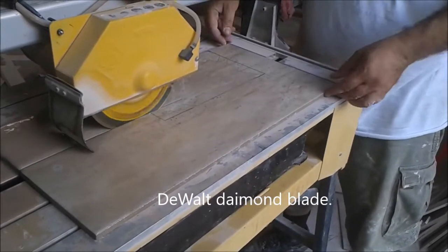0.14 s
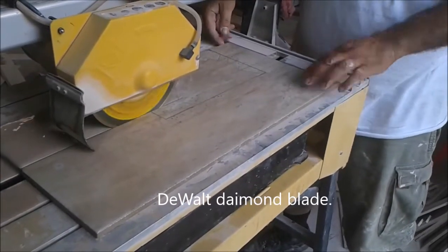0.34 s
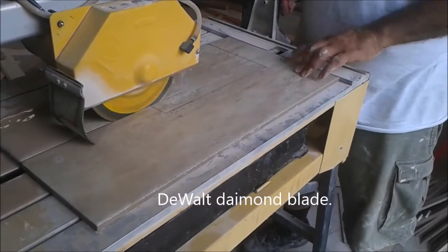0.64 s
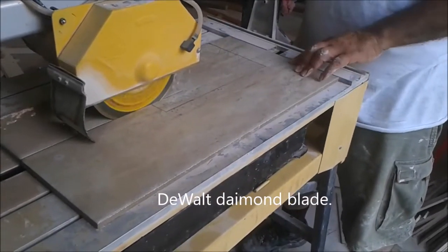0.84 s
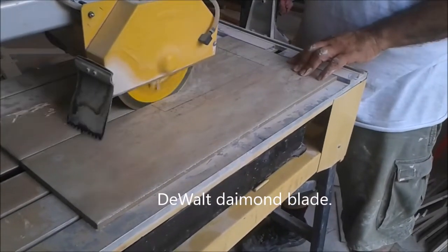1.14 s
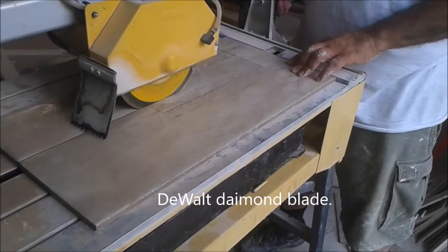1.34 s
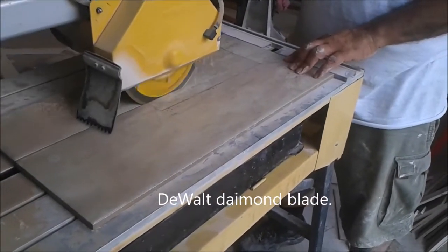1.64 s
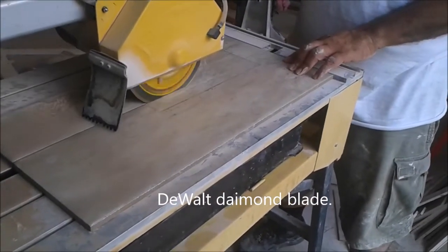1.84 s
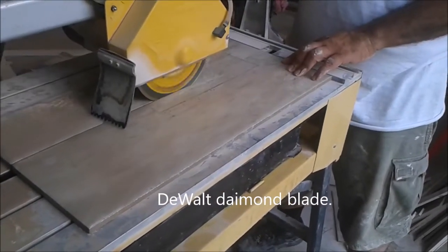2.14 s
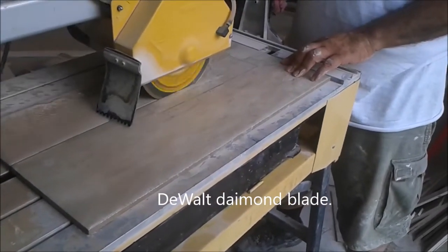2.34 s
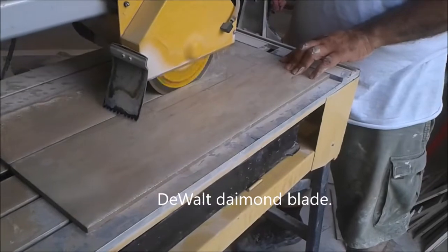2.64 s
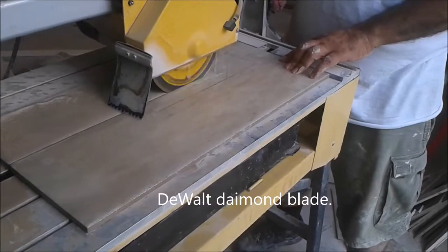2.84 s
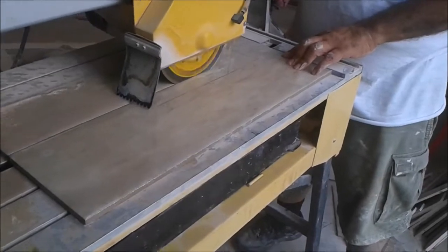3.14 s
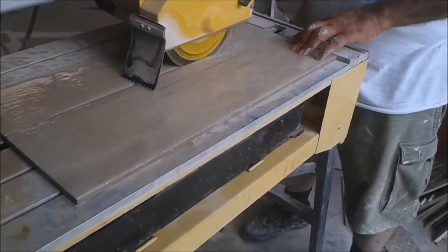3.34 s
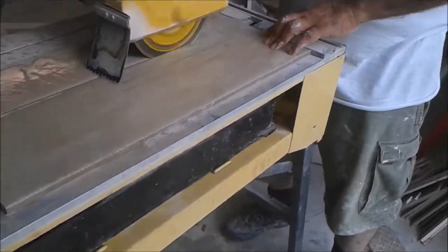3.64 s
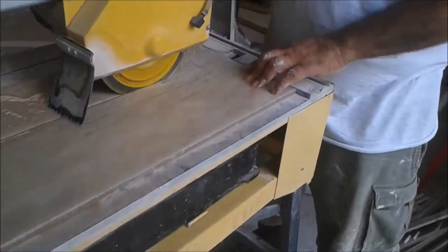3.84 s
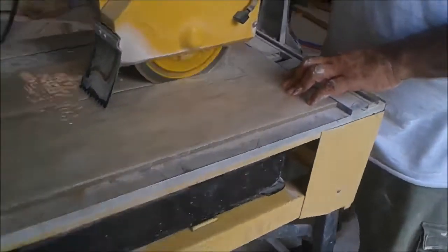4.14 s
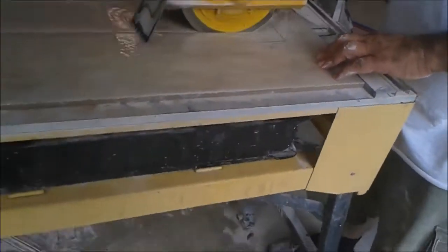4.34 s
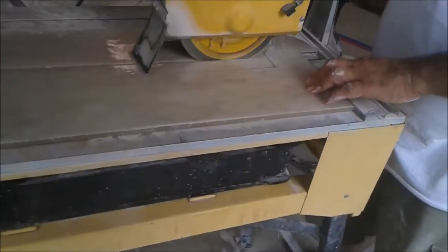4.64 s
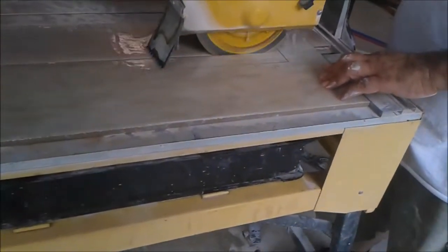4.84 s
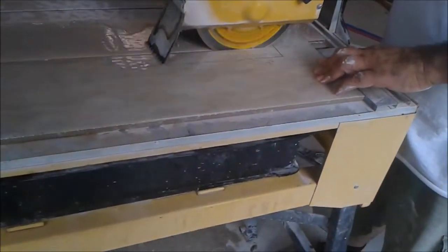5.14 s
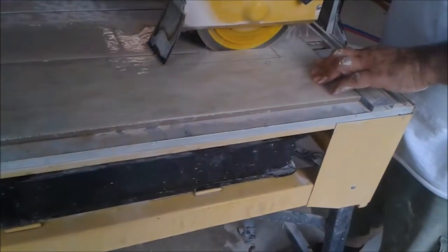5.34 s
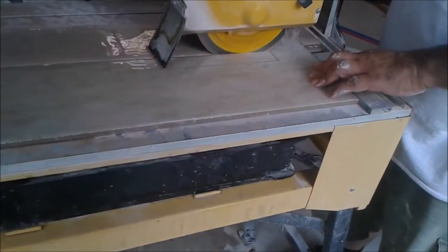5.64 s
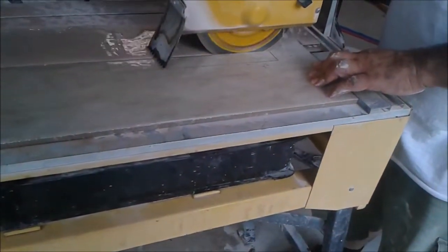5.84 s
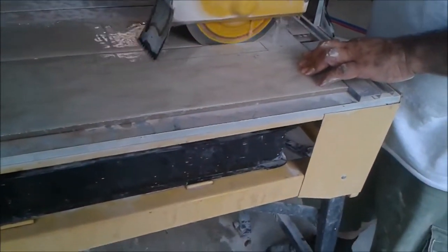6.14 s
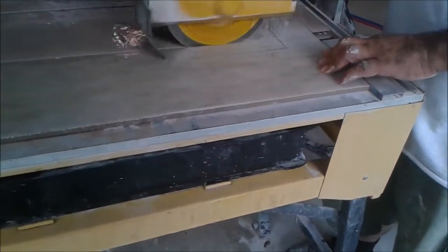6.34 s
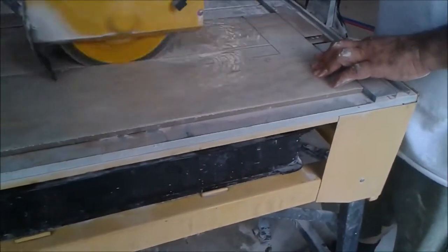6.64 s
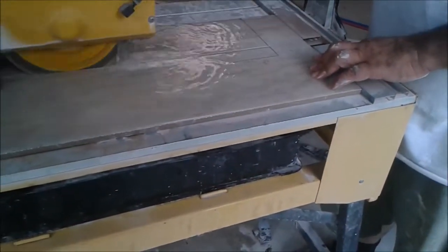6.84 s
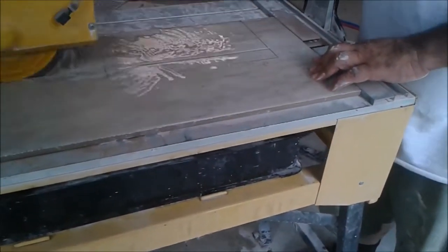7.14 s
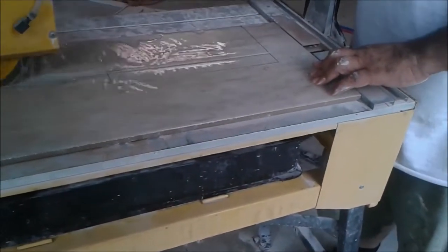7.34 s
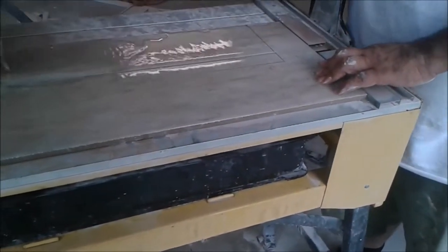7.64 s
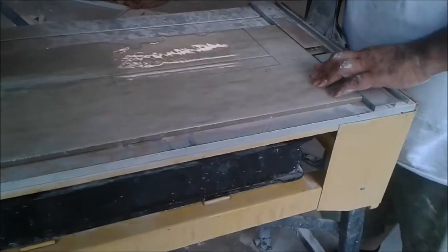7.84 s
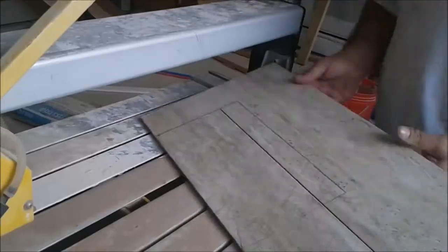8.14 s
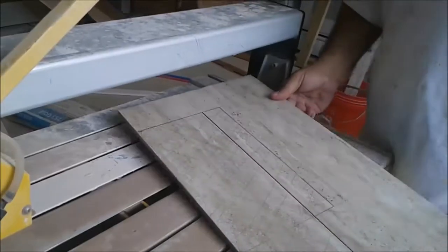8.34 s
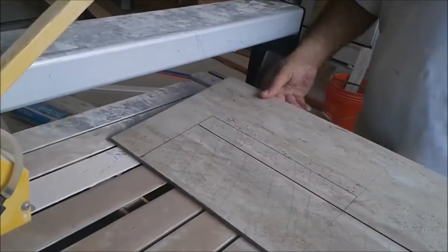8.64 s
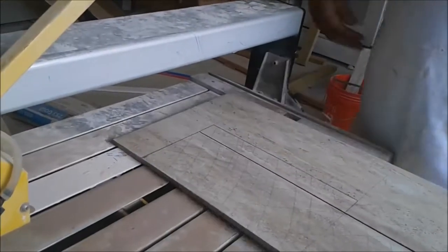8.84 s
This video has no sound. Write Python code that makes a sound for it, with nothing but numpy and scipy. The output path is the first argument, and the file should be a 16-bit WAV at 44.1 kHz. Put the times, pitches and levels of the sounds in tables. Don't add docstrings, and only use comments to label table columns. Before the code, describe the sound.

A wet tile saw whirs, bites into a large tile with a harsh ringing grind, winds down, then a tile knocks and slides on slats.

```python
import sys
import numpy as np
from scipy import signal
from scipy.fft import irfft
from scipy.io import wavfile
from scipy.ndimage import uniform_filter1d

SR = 44100
rng = np.random.default_rng(int(sys.argv[2]) if len(sys.argv) > 2 else 0)


def invert_db(level):
    return 10 ** (np.asarray(level, dtype=float) / 20)


def transcribe(u):
    v = np.clip(np.atleast_2d(u).T, -1, 1)
    q = np.round(v * 32767).astype(np.int16)
    wavfile.write(sys.argv[1], SR, q)


N = 396018
HZ = np.fft.rfftfreq(1024, 1 / SR)[:, None]
T = np.arange(-(-N // 256) + 1) * 256 / SR
LULL_S, OFF_S = 7.53, 7.785

# time_s, repeat_hz
GRIT_RATE = [(0.0, 118.96), (0.88, 118.96), (1.25, 118.65), (1.5, 114.9), (2.1, 114.2), (2.36, 112.2),
             (2.5, 114.5), (2.9, 115.7), (3.6, 114.2), (3.78, 116.3), (4.12, 114.0), (4.8, 116.0),
             (5.2, 115.7), (5.55, 118.3), (6.3, 118.7), (6.75, 116.4), (7.38, 116.0), (7.55, 118.6)]
# time_s, stage_index
CUT_STAGE = [
    (0, 0),
    (1.0, 0),
    (1.3, 1),
    (4.2, 1),
    (4.35, 2),
    (6.45, 2),
    (6.55, 3),
    (7.45, 3),
    (7.55, 4),
    (8.1, 4),
]
# time_s, load_0_to_1
RIM_LOAD = [(0, 0.19), (.09, 0.22), (.14, 0.27), (.45, 0.24), (.55, 0.21), (.9, 0.19), (.96, 0.37),
            (1.2, 0.36), (1.3, 0.94), (3.8, 0.88), (4.1, 0.92), (5.35, 0.97), (5.5, 0.58), (6.17, 0.53),
            (6.21, 0.15), (6.235, 0.15), (6.265, 0.11), (6.3, 0.33), (6.35, 0.2), (6.45, 0.91),
            (6.65, 0.74), (6.9, 0.89), (7.35, 0.97), (7.47, 0.45), (7.53, 0.22)]
LOCKED_SHARE = [0.6, 0.22, 0.35, 0.38, 0.34]
# multiple, level_db
STRONG_ORDERS = [(23, 5), (37, -5.5), (70, 8.5), (77, 5), (82, -4.5), (84, -1), (85, 4.5), (94, 5.5),
                 (100, -3), (101, -1.5), (102, 5), (115, 4), (119, 4.5), (130, -0.5), (131, -3)]
# centre_hz, width_hz
BLADE_MODES = [(2000, 260), (2720, 130), (3250, 180), (4400, 68), (5250, 120), (6550, 230), (7800, 120),
               (8350, 130), (8850, 150), (9650, 170), (9980, 98), (10880, 170), (11300, 65), (12050, 140),
               (12380, 110), (13000, 150), (13750, 250), (14200, 120), (14750, 160), (15500, 340)]
MODE_LEFT = [(-13.5, -8.5, -7, -6.5, -23), (-0.5, -6, -4, -1.5, -4.5), (-16, -9.5, -11.5, -14, -24),
             (-8, -12.5, -19, -13, -18), (-18.5, -10, -15.5, -15.5, -13), (-12.5, -10, -10.5, -6.5, -8.5),
             (-8, -11.5, -6.5, -1, -4), (0, 1.5, -0.5, 3, 2.5), (-6, -5, 3, -1, 0),
             (-6.5, -5.5, 3.5, -1, 0.5), (-1.5, 0, 2.5, 1.5, 5), (-3, 4.5, 6, -1, 4),
             (-1.5, -4.5, 0, 0, 1.5), (9, 3.5, 0, 4, 6), (2, 4.5, 6.5, 4, 0), (-4.5, -2, -8, -4, -2),
             (2, 3, -5, -8, -6.5), (6.5, 1.5, 3, 2, 6.5), (4, -0.5, -3, -3, 1), (1.5, 2, -9, 1, -13)]
MODE_RIGHT = [(-10, -5.5, -7.5, -4.5, -13.5), (0, -3.5, -1, 1.5, -5), (-7, -8, -11.5, -15.5, -12.5),
              (-6, -13, -13, -9.5, -7), (-28, -8.5, -13, -10.5, -7.5), (-8.5, -9, -7, -12, -10),
              (-5.5, -4, -4.5, -12.5, -4), (5, 0, 1.5, 4, 2), (-1, -2, -2.5, -3.5, 3),
              (-1, -0.5, 2.5, -4.5, -1.5), (1, 0.5, -0.5, -1, -6), (-2, -1, 2, -1, 3),
              (-2.5, -0.5, -4.5, -4, 0), (-7, 5, 2.5, -0.5, 0.5), (1, 6, 0, 3.5, 1),
              (-2, -0.5, 1.5, -3.5, 4), (-10, 2.5, -1, 1, -6.5), (12, 6.5, 4, 5.5, 3.5),
              (-5.5, 2.5, 2.5, 4.5, 7), (3, 2, 5, 3, -0.5)]
MODE_BEND = [(-28, 0, 21, -23.5, 110), (8.5, -12.5, -14, -31, 51.5), (34, 22, 5, -110, -160),
             (6, -1, 10.5, -8, -48), (0.5, -10, 0.5, 31, 74), (-68, 6.5, 17, 41, -150),
             (-24, -11, 2, 40, 31), (26, 51, -33, -31, -29.5), (8, 0, 11.5, 21, 60),
             (89.5, -49.5, 27, 76, 91), (-7.5, -40, -59.5, -70, -17), (52, -59.5, 8, 42, 112),
             (-24, -90, -70.5, -30, -10), (79.5, -48.5, -28.5, -61.5, 21.5), (78, -29, 38, 21, 80),
             (-39.5, -31.5, -32, -62, -39), (88, 49, -50.5, -49.5, -10), (-38.5, 28.5, 49, 32, 39.5),
             (-6, 8, 79.5, 30, 161), (-31, 39, 29, 82, 1)]
# freq_hz, phase_rad
RING_LEAD = [(0, 0.5), (2670, 1.55), (3010, 1.7), (6550, 1), (7320, 3), (8350, 1.2), (9130, 1.5),
             (9730, -0.5), (9990, 2), (10900, 1), (11300, 6), (12300, 1.5), (13900, 2.5), (16100, 4.5)]
RING_LEVEL = [-36.5, -38.5, -35, -37, -36.5]
RING_PAN = [3, -0.1, 1.0, -1.2, 8.5]
LOAD_POINTS = [0, .2, .36, .45, 1]
RUMBLE_LEVEL = [-58, -46, -46.5, -46, -47]
RUMBLE_PAN = [38, 55, 42, 24, 5]
GRIND_LEVEL = [-58.5, -50.5, -45, -45.5, -43]
GRIND_PAN = [4.5, 11, 15, 16, 9]
# freq_hz, level_db
RUMBLE_COLOUR = [(40, -46), (100, -34), (130, -12.5), (180, -3), (250, -0.5), (700, 1), (1400, -1.5),
                 (2500, -11), (4000, -14), (8000, -47.5)]
# freq_hz, level_db
HASH_COLOUR = [(600, -48), (1400, -0.5), (2500, -0.5), (4000, -0.5), (7500, -1.5), (10000, 0.5),
               (15700, 0.5)]
# freq_hz, level_db
GRIND_COLOUR = [(600, -37), (1400, -6.5), (2200, -1.5), (3000, 3), (3900, -3), (5200, -2), (5800, -3.5),
                (6600, -1), (7200, -3), (7800, 0.5), (15700, 4)]
# drop_db, fall_db_per_s, rest_db, rest_left_right_db
COAST_DOWN = [
    (21.95, 28, -68.5, 0.5),
    (12, 68, -75.5, 3),
    (2.98, 164, -61.5, 7.5),
]
# centre_hz, width_hz, level_db
FRAME_MODES = [(251, 30, -3), (540, 32, 8), (936, 28, 8), (1280, 30, 8), (1660, 25, -3), (1850, 35, 3.5),
               (2150, 80, -0.5)]
# centre_hz, width_hz, depth_0_to_1
FRAME_GAPS = [(790, 130, .7), (1165, 260, .97), (1560, 150, .75), (2010, 110, .7), (3320, 150, .85),
              (3850, 120, .6), (4400, 200, .7), (4850, 200, .8), (5950, 150, .6)]
# start_s, level_db, pitch_hz, left_right_db
LOW_THUMPS = [(0.264, -58, 117, 65.0), (0.373, -61, 91.5, 57.0), (0.52, -65.5, 94.2, 66.0),
              (1.65, -61.5, 118, 15.0), (1.859, -64, 99.6, -18.5), (2.268, -67, 96.9, -29.0),
              (2.879, -76, 118, -6.5), (3.036, -68, 96.9, 20.5), (3.412, -60, 91, 31.0), (3.66, -62, 110, 19.0),
              (4.307, -60, 118, -19), (4.51, -63.5, 117, 28.0), (4.619, -67.5, 91.5, 4), (4.754, -76, 93, 10),
              (4.918, -64, 113, 4), (5.044, -65.5, 118, -17.0), (5.918, -62, 81, 52.0),
              (6.237, -60.5, 117, 58.5), (6.853, -67, 117, 8.5), (7.124, -61, 118, -2.5),
              (7.71, -60.5, 116, 63.0)]
# time_s, level_db
BEARING = [
    (7.38, -66),
    (7.52, -53),
    (7.65, -55.5),
    (7.78, -59.5),
    (7.83, -64.5),
    (8.0, -64.5),
]
# time_s, level_db
ROOM_LEVEL = [
    [(8.275, -74.5), (8.501, -61), (8.523, -60), (8.555, -61.5)],
    [(8.85, -53), (8.914, -56), (8.98, -53)],
]
# freq_hz, level_db
ROOM_COLOUR = [(40, -45), (70, -22), (100, -6.5), (160, -15), (450, -15), (1300, -20.5), (8400, -14.5),
               (15800, -25)]
# freq_hz, correlation
LIKENESS = [(60, 0.033), (180, 0.91), (550, 0.85), (1650, 0.32), (4970, 0.03), (15000, 0.05)]
# start_s, level_db
DRIPS = [
    (8.4435, -36),
    (8.4454, -44.5),
    (8.446, -46.5),
]
# pitch_hz, level_db, t60_s
TILE_MODES = [(169, -15.5, 0.5), (286, -9.5, 0.23), (369, -3.5, 0.18), (452, -7, 0.19), (554, -4.5, 0.24),
              (668, -2, 0.049), (861, -1, 0.066), (1080, -7.5, 0.091), (1346, 3.5, 0.072),
              (1520, -0.5, 0.054), (1937, 2.5, 0.078), (2220, -8, 0.082), (2340, -3.5, 0.048),
              (3040, -3.5, 0.054), (3780, -5, 0.033), (4200, -11.5, 0.033), (4900, -9, 0.032),
              (5300, -17, .025)]
# time_s, fizz_3_12_khz_db, body_300_2500_hz_db
SLIDE_LEVEL = [
    (8.585, -49.5, -33.5),
    (8.656, -35.5, -39.5),
    (8.798, -36, -41.5),
    (8.822, -46, -45),
    (8.85, -50.5, -50),
    (8.92, -58, -55.5),
]
# start_s, rise_db
SLIDE_GRABS = [
    (8.656, 4),
    (8.701, 4),
    (8.708, 1.5),
    (8.725, 4),
    (8.751, 5.5),
    (8.765, 6),
    (8.785, 1),
    (8.796, 4),
    (8.805, 3),
]
# freq_hz, level_db
FIZZ_COLOUR = [(1500, -24), (2800, -6), (4500, -1), (6000, -2), (7500, 2), (9000, -7.5), (10600, 0.5),
               (12000, -6.5), (15700, -10)]
# freq_hz, left_right_db
FIZZ_BALANCE = [(60, 4), (240, -2), (950, 11), (3770, 6.5), (15000, 3.5)]
# centre_hz, width_hz, level_db
FACE_MODES = [(2970, 88, -4), (4560, 160, -9), (5580, 200, -2.5), (7040, 37, -5), (8300, 66, -4),
              (8900, 480, 3.5), (10500, 84, -18)]


def evened(x):
    return x / np.sqrt(np.mean(x ** 2) + 1e-20)


def read(points, hz):
    f, value = np.transpose(points)
    return np.interp(np.log(hz + 1), np.log(f + 1), value)


def spectra(x):
    return signal.stft(x, nperseg=1024, noverlap=768)[2]


def waves(z, size=N):
    return signal.istft(z, nperseg=1024, noverlap=768)[1][..., :size]


def hiss(size=N):
    return spectra(rng.standard_normal((2, size)))


def patches(wide_hz, long_s, frames=len(T)):
    field = rng.standard_normal((2, frames, len(HZ))).transpose(0, 2, 1)
    field = uniform_filter1d(field, int(wide_hz / HZ[1, 0]) + 1, axis=1)
    return evened(uniform_filter1d(field, int(long_s / T[1]) + 1, axis=2))


def stray(count, long_s):
    size = int(long_s / T[1]) + 1
    curves = uniform_filter1d(rng.standard_normal((count, len(T))), size)
    return evened(uniform_filter1d(curves, size))


def sides(db, pan_db, band_hz):
    left = 2 * invert_db(db) / np.sqrt(1 + invert_db(-2 * pan_db))
    return np.array([left, left * invert_db(-pan_db)])[:, None] * np.sqrt(SR / 2 / band_hz)


def alike(z, same):
    return np.array([z[0], same * z[0] + np.sqrt(1 - abs(same) ** 2) * z[1]])


def resonance(hz, width_hz):
    return 1 / (1 + (2 * (HZ - hz) / width_hz) ** 2)


def coast(db, pan_db, drop_db, fall_db, rest_db, rest_pan_db):
    since = np.maximum(T - OFF_S, 0)
    off = np.clip(since / 0.0059, 0, 1)
    level_db = np.maximum(db - drop_db * off - fall_db * since, rest_db)
    return level_db, pan_db + off * (rest_pan_db - pan_db)


def rim(count=132):
    orders = np.zeros((2, 4097), complex)
    draws = rng.standard_normal((2, count - 12, 2)) @ [1, 1j]
    orders[:, 12:count] = draws * invert_db(1.5 * rng.standard_normal((2, count - 12)))
    for k, db in STRONG_ORDERS:
        orders[:, round(k)] *= invert_db(db) * np.sqrt(2) / abs(orders[:, round(k)])
    rate_hz = np.interp(np.arange(N) / SR, *np.transpose(GRIT_RATE))
    angle = np.cumsum(rate_hz) / SR % 1
    reach = np.sqrt(count * 118 / (SR / 2))
    table_angle = np.linspace(0, 1, 8192)
    return spectra(np.array([reach * np.interp(angle, table_angle, evened(w)) for w in irfft(orders)]))


def blade_modes(load, weight):
    wander_hz, wander_db, wander_s = 34, 1.5, .35
    centre, width = np.transpose(BLADE_MODES)
    count = len(BLADE_MODES)
    grip = np.clip(load, 0, 1)
    centre = centre[:, None] + np.array(MODE_BEND) @ weight + grip * wander_hz * stray(count, wander_s)
    level_db = np.array([MODE_LEFT, MODE_RIGHT]) @ weight + grip * wander_db * stray(count, wander_s)
    power = invert_db(2 * level_db)
    centre, power = centre[:, ::4], power[..., ::4]
    ring = np.sqrt(sum(power[:, k, None] / (1 + (2 * (HZ - centre[k]) / width[k]) ** 2) ** 1.2
                       for k in range(count)))
    ring = np.repeat(ring, 4, axis=2)[..., :len(T)]
    ring = ring / np.sqrt(1 + (1600 / (HZ + 1)) ** 12)
    return ring * invert_db(0.9 * np.clip((HZ - 9500) / 3000, 0, 1))


def blade(load, weight):
    slack_db, pan_lag_db, pan_lag_s, likeness = -5, 5.5, .08, .6
    level_db = RING_LEVEL @ weight + slack_db * np.maximum(LOAD_POINTS[1] - load, 0)
    lag = weight[-1] * np.exp(-np.maximum(T - LULL_S, 0) / pan_lag_s)
    level_db, pan_db = coast(level_db, RING_PAN @ weight - pan_lag_db * lag, *COAST_DOWN[2])
    ring = blade_modes(load, weight) * sides(level_db + 1.0, pan_db, 7700)
    locked = np.clip(np.array(LOCKED_SHARE) @ weight, 0, 1)
    drive = np.sqrt(locked) * rim() + np.sqrt(1 - locked) * hiss()
    drive = alike(drive, likeness * np.exp(-1j * read(RING_LEAD, HZ)))
    fast_db = np.array([1.9, 2.6])[:, None, None] * patches(300, .12)
    slow_db = 1.4 * patches(250, .5)
    return drive * ring * invert_db(fast_db + slow_db)


def rumble(load, hum):
    level_db = np.interp(load, LOAD_POINTS, RUMBLE_LEVEL)
    pan_db = np.interp(load, LOAD_POINTS, RUMBLE_PAN)
    level_db, pan_db = coast(level_db, pan_db, *COAST_DOWN[0])
    low = invert_db(read(RUMBLE_COLOUR, HZ)) * sides(level_db, pan_db, 1250)
    low = low * invert_db(8.5 * patches(150, 0.09) * np.exp(-(HZ / 150) ** 2))
    low *= np.where(T > OFF_S, 1 / (1 + (440 / (HZ + 1)) ** 6), 1)
    low[1] *= invert_db(2 * patches(1500, .05)[1])
    return low * np.where(T > OFF_S, np.sqrt(0.16 + hum), 1)


def grind(load, weight):
    clear_db, clear_pan_db = -3, 6
    level_db = np.interp(load, LOAD_POINTS, GRIND_LEVEL) + clear_db * weight[-1]
    pan_db = np.interp(load, LOAD_POINTS, GRIND_PAN) - clear_pan_db * weight[-1]
    level_db, pan_db = coast(level_db, pan_db, *COAST_DOWN[1])
    colour = invert_db(np.array([read(HASH_COLOUR, HZ), read(GRIND_COLOUR, HZ)]))
    return colour * sides(level_db, pan_db, 4400)


def frame_gaps():
    close_s, drift_hz, right_share = 7.85, 90, .4
    late = T > LULL_S
    gaps = np.ones((len(HZ), len(T)))
    drifts = drift_hz * stray(len(FRAME_GAPS), .04)[:, late]
    gaps[:, late] = np.prod([1 - depth / (1 + (2 * (HZ - f - drift * f / 4000) / w) ** 4)
                             for (f, w, depth), drift in zip(FRAME_GAPS, drifts)], axis=0)
    opening = np.clip((T - LULL_S) / 0.08, 0, 1)
    closing = np.clip((close_s - T) / .08 + 1, 0, 1)
    return 1 + (gaps - 1) * opening * closing * np.array([1, right_share])[:, None, None]


def saw():
    lull_length_s, lull_depth, hum_s = 0.24, 0.11, 6.9
    lull = np.sin(np.pi * np.clip((T - LULL_S) / lull_length_s, 0, 1)) ** 0.9
    load = np.interp(T, *np.transpose(RIM_LOAD)) - lull_depth * lull
    stage = np.interp(T, *np.transpose(CUT_STAGE))
    weight = np.maximum(1 - abs(stage - np.arange(5)[:, None]), 0)
    ring = blade(load, weight)
    hum = sum(invert_db(2 * db) * resonance(f, w) for f, w, db in FRAME_MODES)
    hum_on = (T > hum_s) & (T < OFF_S)
    frame = 4 * invert_db(np.array([-67, -66]))[:, None, None] * np.sqrt(hum) * (HZ > 700) * hum_on
    relief = invert_db(np.array([2.2, 4.3])[:, None, None] * patches(130, .11))
    low = rumble(load, hum) * relief ** 0.45
    gaps = frame_gaps()
    bed = np.sqrt(low ** 2 + (grind(load, weight) * relief) ** 2 + frame ** 2) * hiss()
    return waves((ring + bed) * gaps)


def thumps():
    length_s, lift_db, pitch_ratio = 0.031, 10.5, 0.89
    out, t = np.zeros((2, N)), np.arange(0, length_s, 1 / SR)
    for s, db, hz, pan_db in LOW_THUMPS:
        swell = invert_db(db + lift_db) * np.hanning(len(t)) * np.sin(2 * np.pi * pitch_ratio * hz * t)
        out[:, round(s * SR):][:, :len(t)] += invert_db(np.minimum([[pan_db], [-pan_db]], 0)) * swell
    return out


def whine():
    lower_hz, upper_hz, upper_db = 2680, 2870, -7.5
    t = np.arange(N) / SR
    waver_hz = 11.0 * evened(uniform_filter1d(rng.standard_normal(N), 1500))
    lower = np.sin(2 * np.pi * np.cumsum(lower_hz + waver_hz) / SR)
    upper = np.sin(2 * np.pi * np.cumsum(upper_hz + waver_hz[::-1]) / SR)
    tone = np.sqrt(2) * (lower + invert_db(upper_db) * upper)
    band = signal.butter(2, [2520, 3150], "bandpass", fs=SR, output="sos")
    fuzz = evened(signal.sosfilt(band, rng.standard_normal((2, N))))
    fuzz = fuzz * invert_db(np.where(t < OFF_S, 1.5, -2.0))
    return invert_db(np.interp(t, *np.transpose(BEARING))) * (tone + fuzz) * (t > BEARING[0][0])


def room(t):
    s, db = np.transpose(ROOM_LEVEL[0] + ROOM_LEVEL[1])
    tone = alike(hiss(len(t)), read(LIKENESS, HZ)) * invert_db(read(ROOM_COLOUR, HZ))
    fade = np.clip((t - s[0]) / 0.042, 0, 1)
    return evened(waves(tone, len(t))) * invert_db(np.interp(t, s, db) + 3.5) * fade


def ticks():
    out, t = np.zeros(N), np.arange(60) / SR
    for s, db in DRIPS:
        out[round(s * SR):][:60] += invert_db(db) * np.sin(2 * np.pi * 13000 * t) * np.exp(-t / .00015)
    return out * invert_db(np.array([[-12.], [0.]]))


def knock():
    start_s, level_db = 8.5795, -24.5
    out, t = np.zeros((2, N)), np.arange(SR // 3) / SR
    hz, db, t60 = np.transpose(TILE_MODES)[:, :, None]
    shape = (2, len(TILE_MODES), 1)
    phase = rng.uniform(0, 2 * np.pi, shape[1:]) + hz / 1500 * rng.standard_normal(shape)
    wobble = 1 + .5 * np.sin(2 * np.pi * (rng.uniform(22, 97, shape) * t + rng.random(shape)))
    envelope = invert_db(db - 60 * t / t60) * wobble * (1 - np.exp(-t * hz / 5.0))
    ring = (envelope * np.sin(2 * np.pi * hz * t + phase)).sum(1)
    crack = invert_db(16.0) * uniform_filter1d(rng.standard_normal((2, len(t))), size=4)
    crack = crack * np.exp(-t / 0.0045) * (1 - np.exp(-t / .0003))
    crack = uniform_filter1d(crack, size=5)
    crack -= uniform_filter1d(crack, size=60)
    out[:, round(start_s * SR):][:, :len(t)] = invert_db(level_db - 7.0) * (ring + crack)
    return out


def slide_fizz(t, grabs_db):
    grit = invert_db(.7 * np.minimum(rng.exponential(1, (2, len(t))), 4)) * rng.standard_normal((2, len(t)))
    slipping = rng.random((2, len(t))) < 14000 / SR
    slips = spectra(evened(grit * slipping) * invert_db(grabs_db))
    face = sum(invert_db(2 * db + 14.5) * resonance(f, w) for f, w, db in FACE_MODES)
    pan = invert_db(read(FIZZ_BALANCE, HZ) / 2)
    colour = invert_db(read(FIZZ_COLOUR, HZ)) * np.sqrt(1 + face) * np.array([pan, 1 / pan])
    return evened(waves(slips * colour * invert_db(3.3 * patches(500, .02, slips.shape[2])), len(t)))


def slide_body(t, grabs_db):
    tilt_db_per_octave = -1.5
    modes = np.sqrt(sum(invert_db(1.4 * db + tilt_db_per_octave * np.log2(f / 500)) * resonance(f, 100)
                        for f, db, _ in TILE_MODES))
    rub = alike(hiss(len(t)), read(LIKENESS, HZ)) * modes * (HZ > 130)
    rub = rub * invert_db(4.8 * patches(300, .03, rub.shape[2]))
    return evened(waves(rub, len(t))) * invert_db(0.31 * grabs_db)


def slide(t):
    s, fizz_db, body_db = np.transpose(SLIDE_LEVEL)
    grabs_db = sum(db * np.exp(-np.maximum(t - at, 0) / 0.0086) * np.clip((t - at) / 0.0042 + 1, 0, 1)
                   for at, db in SLIDE_GRABS)
    fizz = slide_fizz(t, grabs_db) * invert_db(np.interp(t, s, fizz_db) + 2.0)
    body = slide_body(t, grabs_db) * invert_db(np.interp(t, s, body_db) - 2.0)
    edge = np.clip((t - s[0]) / 0.0032, 0, 1) * np.exp(-np.maximum(t - s[-1], 0) / 0.036)
    return edge * (fizz + body)


def scene():
    cut_s, tail_s = 8.0, 8.2
    t = np.arange(N) / SR
    mix = (saw() + thumps() + whine()) * np.clip((cut_s - t) / .004, 0, 1)
    mix += ticks() + knock()
    tail = t > tail_s
    mix[:, tail] += room(t[tail]) + slide(t[tail])
    return mix


def low_pass(x):
    return signal.sosfilt(signal.butter(12, 15840, fs=SR, output="sos"), x)


def record(dry):
    low_cut_hz = 75
    heard = signal.sosfilt(signal.butter(2, low_cut_hz, "highpass", fs=SR, output="sos"), dry)
    return low_pass(heard)


dry = scene()
out = record(dry)
transcribe(out)
```